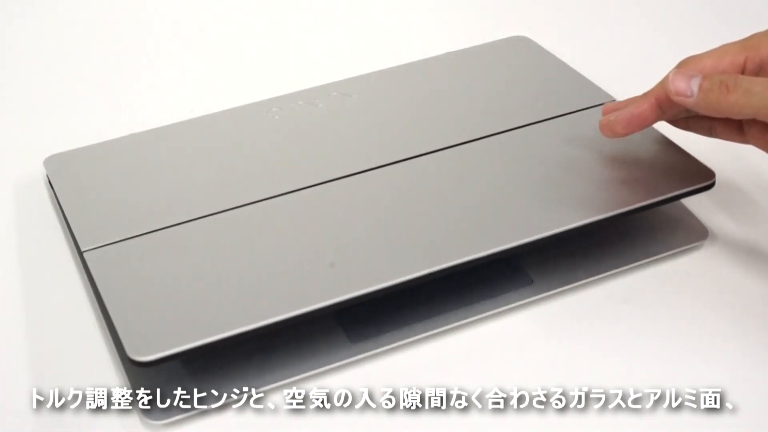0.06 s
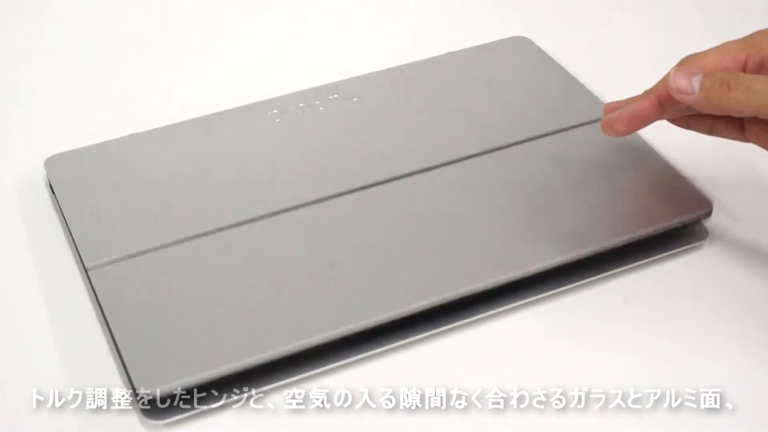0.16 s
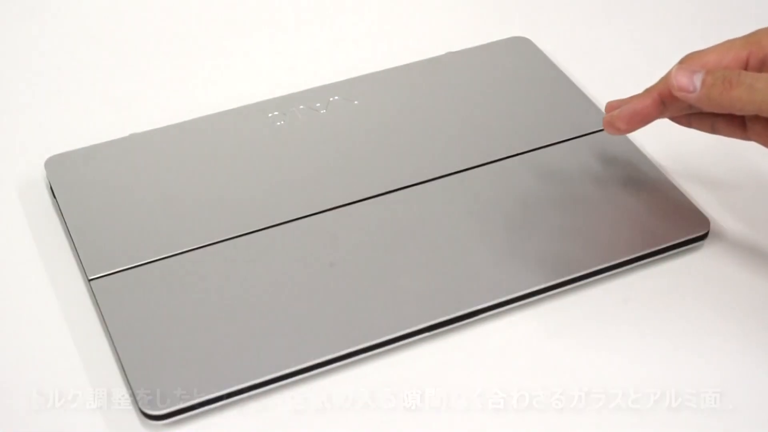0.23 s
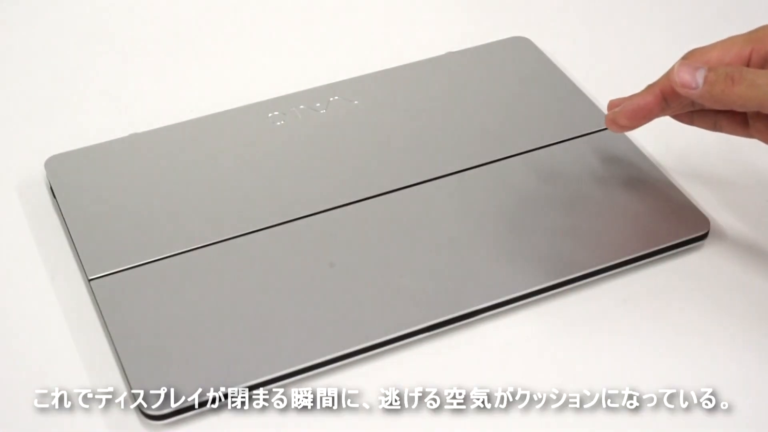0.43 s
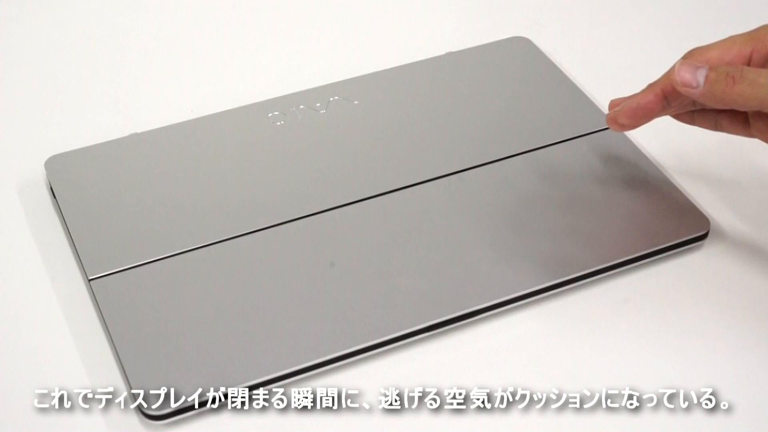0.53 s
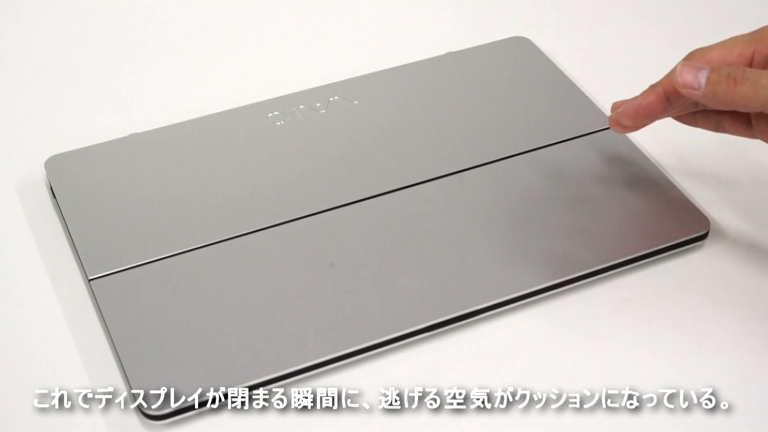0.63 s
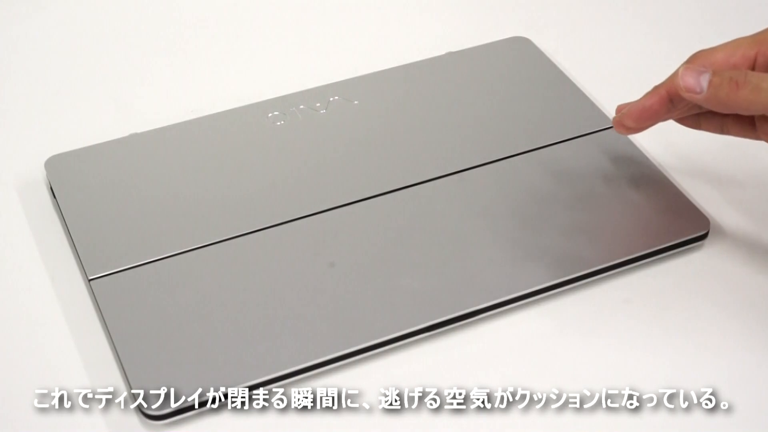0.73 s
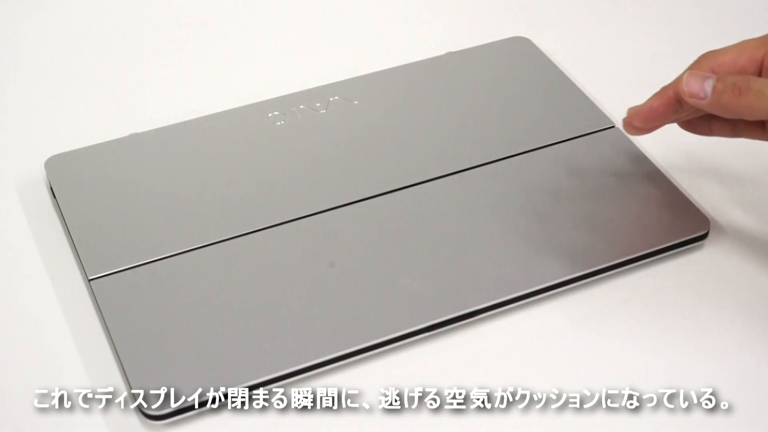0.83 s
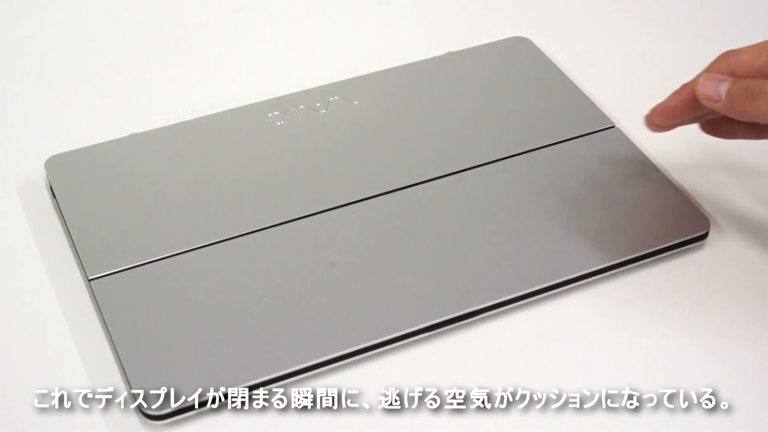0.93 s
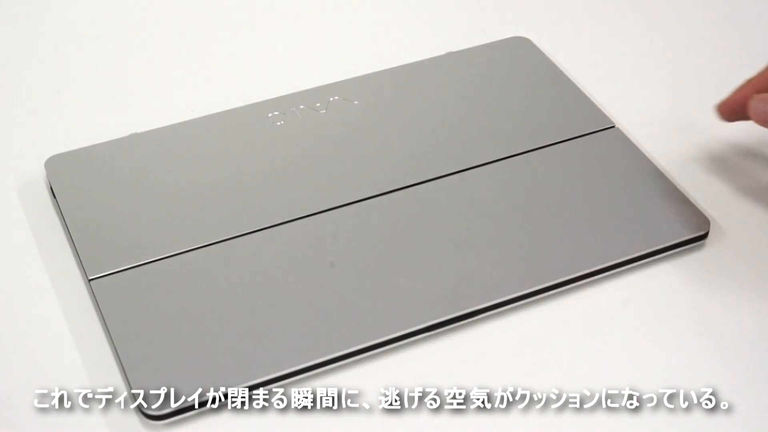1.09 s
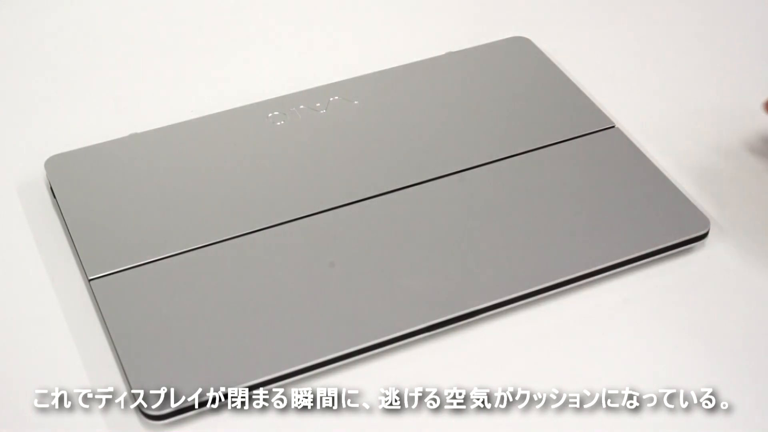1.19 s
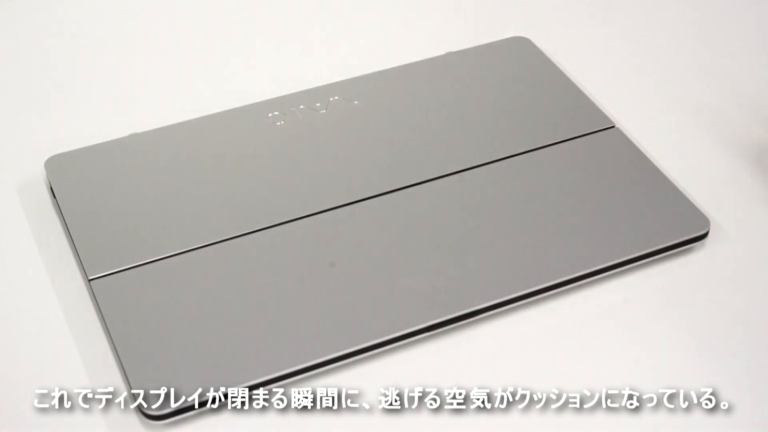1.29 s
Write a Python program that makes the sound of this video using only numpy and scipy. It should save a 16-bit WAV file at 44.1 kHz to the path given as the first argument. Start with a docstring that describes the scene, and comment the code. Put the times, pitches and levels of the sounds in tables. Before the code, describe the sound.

A thin metal laptop lid shuts with one soft thump at about 0.2 seconds. The low knock sounds through the case and table, blended with a dull puff of escaping air and a tiny, bright metallic tick from the rim. It dies away by about 0.5 seconds with a short room tail. Faint, steady ventilation noise and a low electrical hum lie underneath from start to end.

```python
"""A thin aluminium laptop lid is pushed shut on a table in a quiet room.
Cushioned by air, which escapes in a dull puff, it lands in three quick soft contacts that thump
through case and table top. Its rim meets the base in a brief patter of tiny ticks that ring the shell.
A short room tail follows. Ventilation, fan tones and a mains hum lie beneath."""
import sys
import numpy as np
from scipy import signal
from scipy.fft import rfft, irfft
from scipy.io import wavfile

SR = 44100
rng = np.random.default_rng(int(sys.argv[2]) if len(sys.argv) > 2 else 0)


def unload_audio(sound):
    """Save the sound as a 16-bit wav file, at the path given as the first command line argument."""
    columns = np.transpose(np.atleast_2d(sound))
    # keep every value between -1 and 1, then stretch to whole-number steps
    steps = np.round(np.clip(columns, -1, 1) * 32767)
    wavfile.write(sys.argv[1], SR, steps.astype(np.int16))


N = 59535
TIME = np.arange(N) / SR
FREQS = np.maximum(np.arange(N // 2 + 1) * SR / N, 1)


def from_db(db):
    """Decibels to gain."""
    return 10 ** (np.asarray(db) / 20)


def rms_one(x):
    """Scale to unit rms."""
    return x / np.sqrt(np.mean(x ** 2) + 1e-20)


def panned(db):
    """Stereo gains that put the left db above the right."""
    return from_db([[db / 2], [-db / 2]])


def decay(age, t60):
    """An envelope that falls 60 dB in t60 seconds."""
    return np.exp(-np.log(1000) * age / t60)


def filtered(x, kind, hz, order=2):
    """Butterworth filter."""
    return signal.sosfilt(signal.butter(order, hz, kind, fs=SR, output="sos"), x)


def over_freqs(points):
    """Draw a curve through (f/Hz, value) points on a log-frequency axis."""
    hz, value = np.transpose(points)
    return np.interp(np.log(FREQS), np.log(hz), value)


def coloured_pair(two, colour, likeness):
    """Two unrelated signals become mid and side, with an EQ curve and a left-right likeness."""
    mid, side = rfft(two) * from_db(over_freqs(colour))
    alike = np.clip(over_freqs(likeness), -1, 1)
    return irfft(np.sqrt(1 + alike) * mid + np.sqrt(1 - alike) * side * [[1], [-1]], N)


def ring(force, hz, t60):
    """One mode: a unit click starts a dying cosine of height 1."""
    r, w = decay(1 / SR, t60), 2 * np.pi * hz / SR
    return signal.lfilter([1, -r * np.cos(w)], [1, -2 * r * np.cos(w), r * r], force + 1e-18)


def resonance(x, hz, width_hz):
    """Band-pass with unity gain at its peak."""
    r, w = np.exp(-np.pi * width_hz / SR), 2 * np.pi * hz / SR
    return signal.lfilter(np.array([1, 0, -1]) * (1 - r * r) / 2, [1, -2 * r * np.cos(w), r * r], x + 1e-18)


def ventilation():
    """A steady bed of moving air: centred rumble thinning to wide hiss."""
    # EQ curve of the air: f/Hz, relative level/dB
    colour = [(20, -15), (48, -2.5), (70, -8), (100, -9.5), (135, -11.5), (190, -9), (255, -15.5),
              (295, -7), (330, -13.5), (390, -13.5), (440, -18.5), (680, -17), (820, -23.5), (1100, -26),
              (2300, -32.5), (6000, -36.5), (15500, -41.5)]
    # stereo image of the air: f/Hz, left-right correlation
    likeness = [(60, 0.9), (130, 0.83), (290, 0.91), (640, 0.8), (1410, 0.27), (3100, 0.0), (15000, 0.0)]
    return from_db(-51.5) * rms_one(coloured_pair(rng.standard_normal((2, N)), colour, likeness))


def hum():
    """Mains hum and fan tones waver in level and phase, a little weaker at first."""
    # mains and fan tones: f/Hz, level/dB, waver depth
    tones = [(59.2, -61.5, 0.33), (80, -69.5, 0.72), (116.45, -56, 0.091), (234.5, -67, 0.94),
             (290.7, -68.5, 0.41), (704, -84, 0.62)]
    waver_hz, start_db, rise_s = 11.7, -6, 0.49
    smoothing = 1 + (FREQS / waver_hz) ** 2
    drone = np.zeros(N)
    for hz, db, depth in tones:
        level_drift, phase_drift = rms_one(irfft(rfft(rng.standard_normal((2, N))) / smoothing, N))
        phase = 2 * np.pi * (hz * TIME + rng.random())
        tone = (1 + depth * level_drift) * np.sin(phase) + depth * phase_drift * np.cos(phase)
        drone += from_db(db) * rms_one(tone)
    return drone * from_db(start_db * np.maximum(1 - TIME / rise_s, 0))


def rim_patter():
    """Tiny ticks swell as the rim seats, die quickly and ring the metal shell."""
    # EQ curve of the ticks: f/Hz, relative level/dB
    colour = [(1000, 5.5), (2000, -3.5), (3000, -0.5), (4500, -5.5), (6500, -10), (9000, -17), (15000, -27)]
    # stereo image of the ticks: f/Hz, left-right correlation
    likeness = [(700, 0.9), (1300, 1), (2400, 0.58), (4400, 0.27), (9000, 0.036)]
    # resonances of the shell: f/Hz, width/Hz, level/dB
    shell_rings = [(1680, 35, 7), (1982, 34, 9), (2520, 86, -0.5), (3100, 69, -30), (4220, 93, 8),
                   (5380, 74, -5)]
    seat_s, rise_s, rise_db, hold_s = 0.2265, 0.0071, 15, 0.0025
    ticks_per_s, spread_db = 11000, 3
    age = TIME - seat_s
    swell = from_db(rise_db * np.minimum(age, 0) / rise_s) * (age > -rise_s)
    fade = decay(np.maximum(age - hold_s, 0), t60=0.041)
    sizes = from_db(spread_db * np.minimum(rng.exponential(1, (2, N)), 2))
    signs = rng.choice([-1, 1], (2, N))
    onsets = rng.random((2, N)) < ticks_per_s / SR
    ticks = filtered(sizes * signs * onsets, "high", hz=830)
    patter = rms_one(coloured_pair(ticks, colour, likeness)) * swell * fade
    shell = sum(from_db(db) * resonance(patter, hz, width_hz) for hz, width_hz, db in shell_rings)
    return from_db(-41) * panned(db=-1) * (patter + shell)


def air_puff():
    """The air cushion is squeezed from under the lid in a short, dull rush."""
    start_s, attack_s = 0.222, 0.0034
    age = np.maximum(TIME - start_s, 0)
    envelope = np.minimum(age / attack_s, 1) * decay(age, t60=0.31)
    rush = filtered(rng.standard_normal(N), "band", hz=[163, 700], order=3)
    return from_db(-42.5) * panned(db=-2) * rms_one(rush) * envelope


def lid_thump():
    """Each contact is a soft downward push that sets the modes of case and table ringing."""
    # the lid lands and settles: t/s, level/dB, softness/ms
    contacts = [(0.2222, -22.5, 0.49), (0.2262, -15, 0.78), (0.2329, -35, 0.31)]
    # modes of case and table top: f/Hz, level/dB, t60/s, pan left-right/dB
    modes = [(58.3, -17.5, 0.11, -2), (78.4, -14.5, 0.33, -2), (113.6, -9, 0.29, -0.5),
             (138, -14, 0.16, -0.5), (246, -12, 0.18, 0.5), (279, -25, 0.32, -5.5), (350, -12, 0.2, -4.5),
             (554, -5.5, 0.095, -1.5), (660, -10, 0.093, 2), (737, -22, 0.15, -7), (818, -13, 0.054, -3),
             (1020, -16, 0.032, -9), (1220, -13, 0.05, -1), (1407, -12.5, 0.092, 3)]
    force = np.zeros(N)
    for start_s, db, soft_ms in contacts:
        progress = np.maximum(TIME - start_s, 0) * 1000 / soft_ms
        push = progress * np.exp(-2 * progress)
        force -= from_db(db) * push / push.sum()
    body = sum(ring(force, hz, t60) * from_db(db) * panned(pan_db) for hz, db, t60, pan_db in modes)
    return filtered(body, "high", hz=43.7)  # the small case radiates little deep bass


def room(send):
    """A short diffuse tail with little bass, different at each ear."""
    predelay_s = 0.0083
    tail = rng.standard_normal((2, N)) * decay(TIME, t60=0.24) * (TIME > predelay_s)
    tail /= np.sqrt(np.sum(tail ** 2) / 2)
    tail = filtered(tail, "band", hz=[219, 12000])
    return signal.fftconvolve(send, tail, axes=1)[:, :N]


def scene():
    """The closing lid, its rim wetter than its body, over the bed of air and hum."""
    body_send_db, rim_send_db = -16.5, -9
    body = air_puff() + lid_thump()
    rim = rim_patter()
    reverb = room(from_db(body_send_db) * body + from_db(rim_send_db) * rim)
    bed = (ventilation() + hum()) * panned(db=-0.24)
    return body + rim + reverb + bed


def record(dry):
    """A steep low-pass takes off the very top."""
    cutoff_hz = 15700
    return signal.fftconvolve(dry, signal.firwin(801, cutoff_hz, fs=SR)[None], "same", axes=1)


dry = scene()
out = record(dry)
unload_audio(out)
```